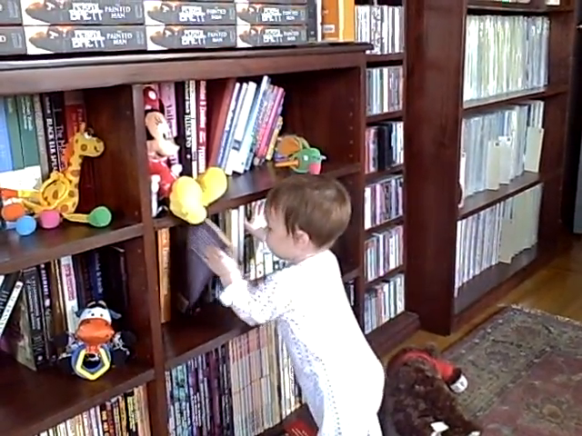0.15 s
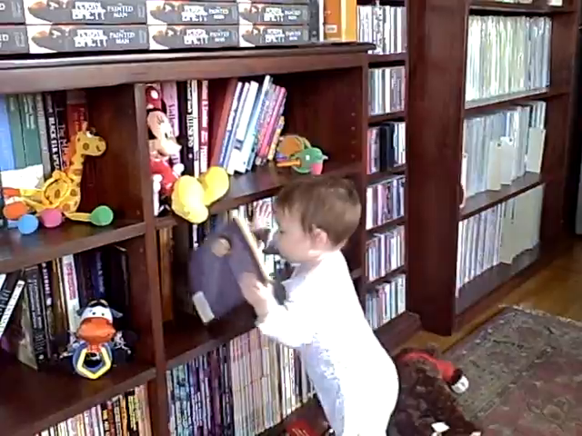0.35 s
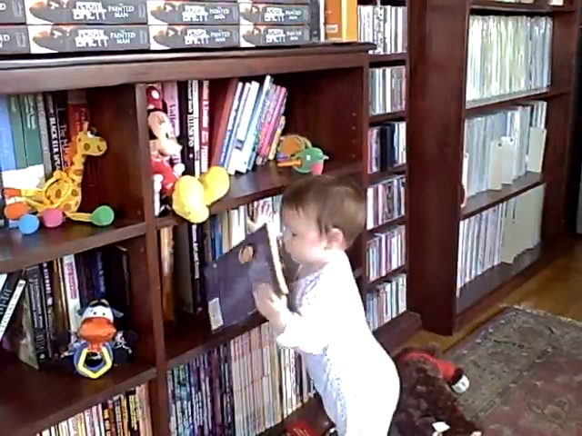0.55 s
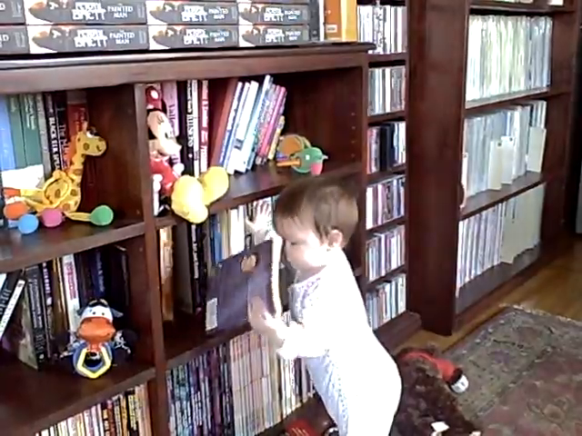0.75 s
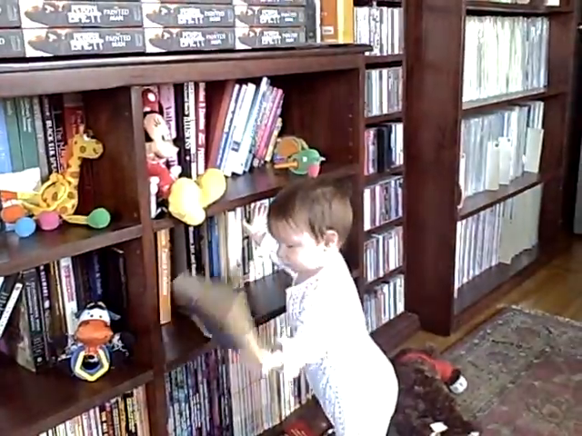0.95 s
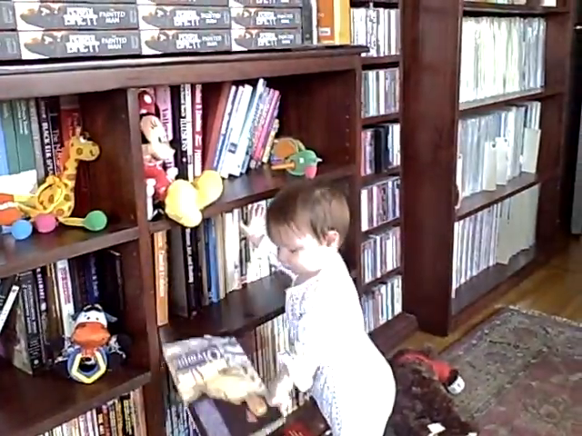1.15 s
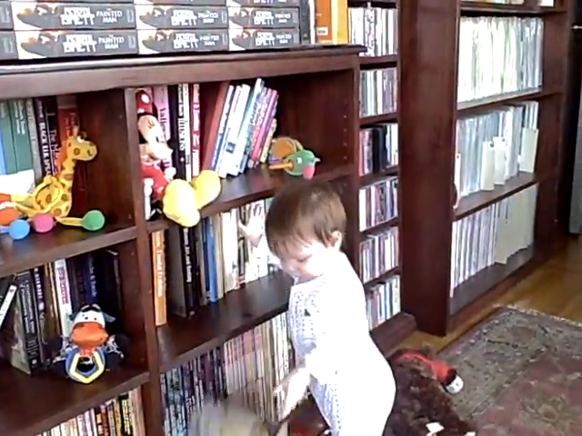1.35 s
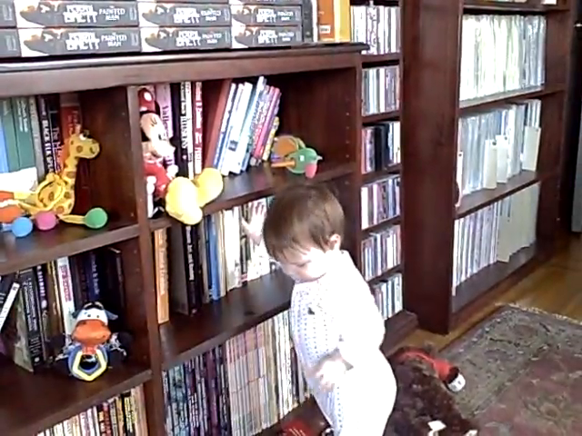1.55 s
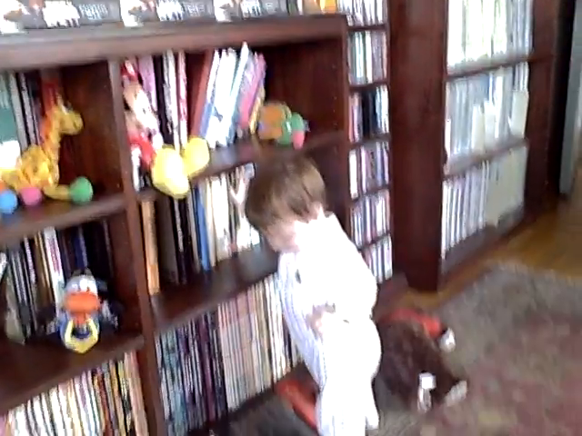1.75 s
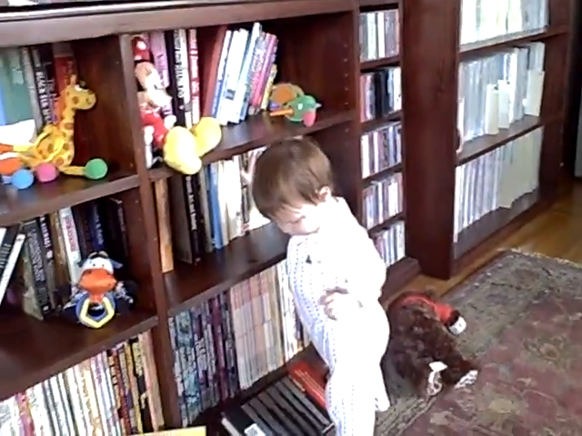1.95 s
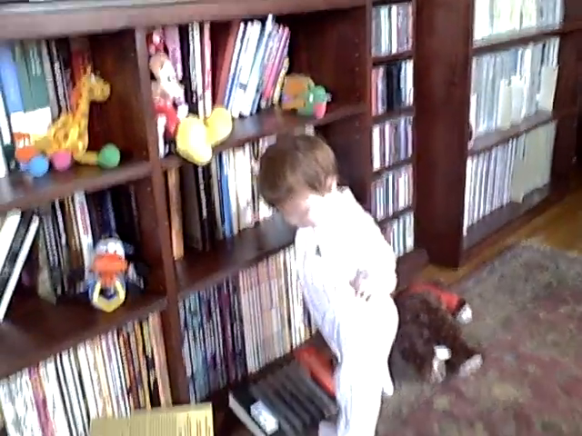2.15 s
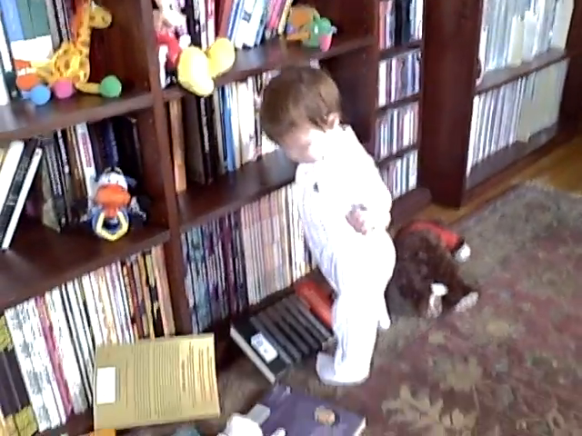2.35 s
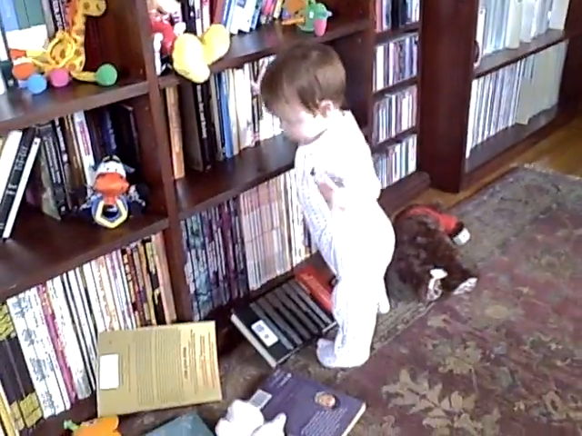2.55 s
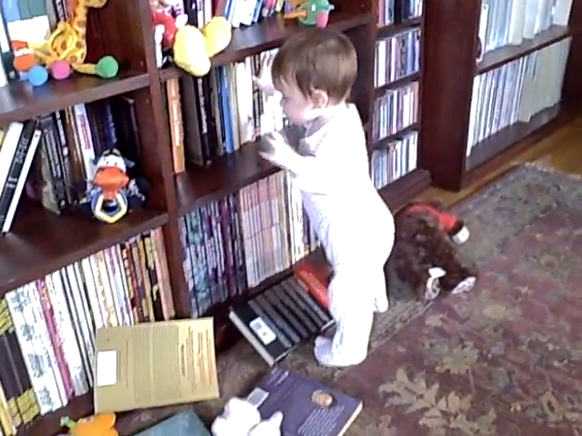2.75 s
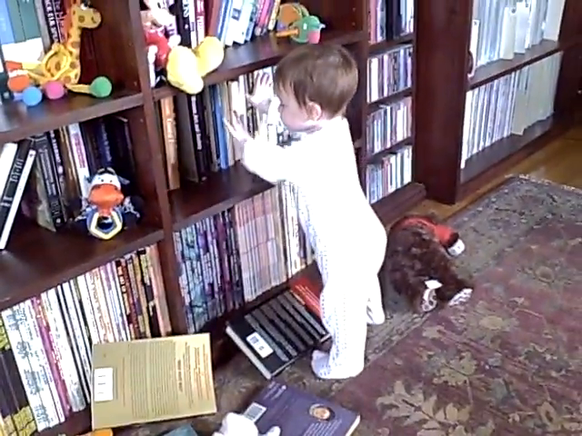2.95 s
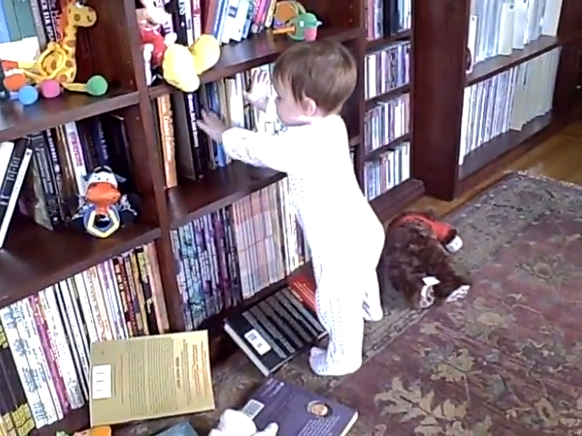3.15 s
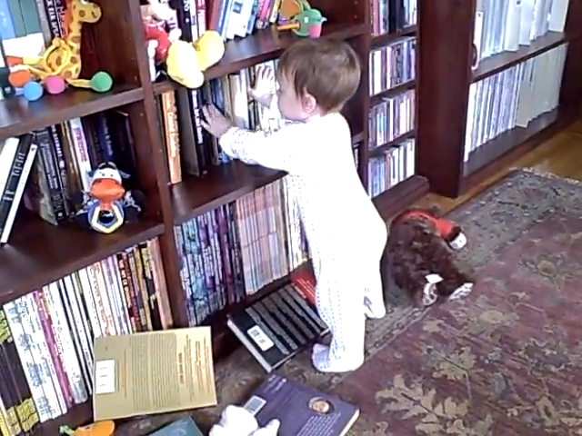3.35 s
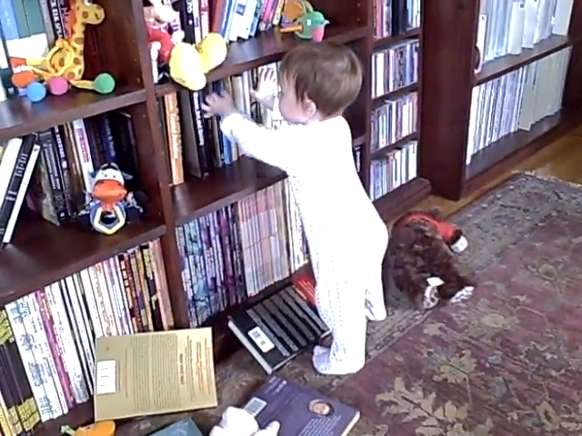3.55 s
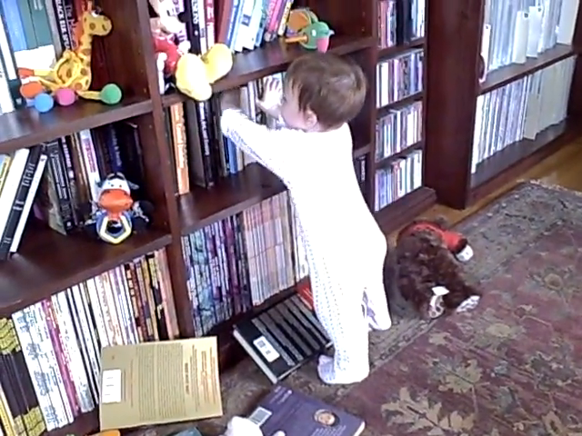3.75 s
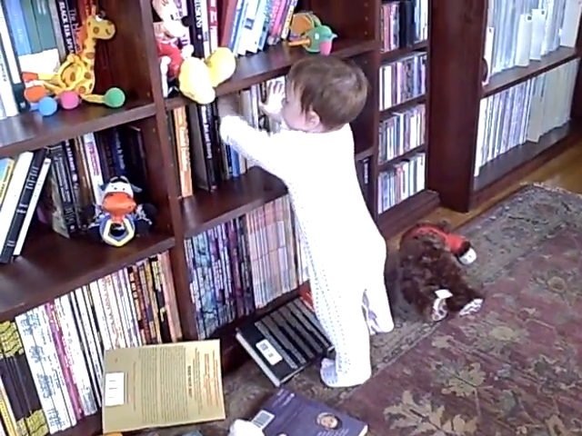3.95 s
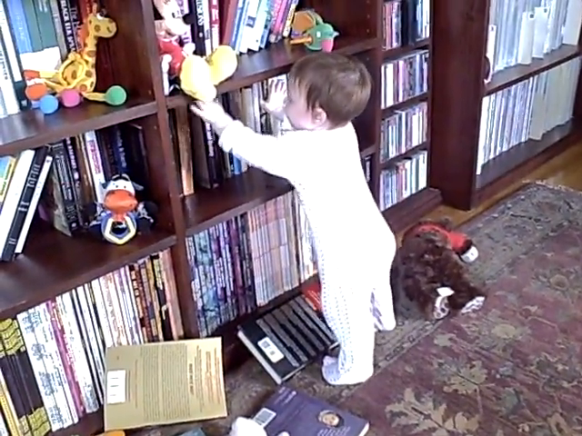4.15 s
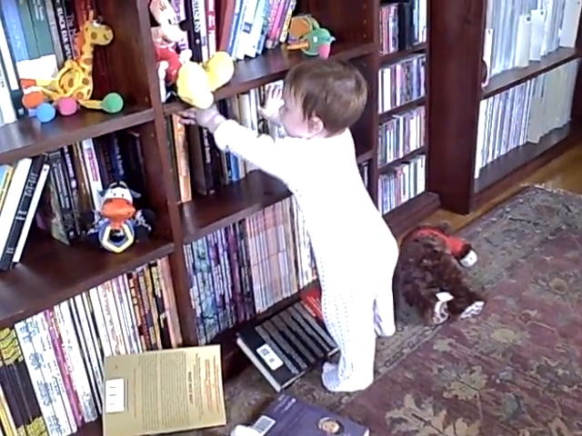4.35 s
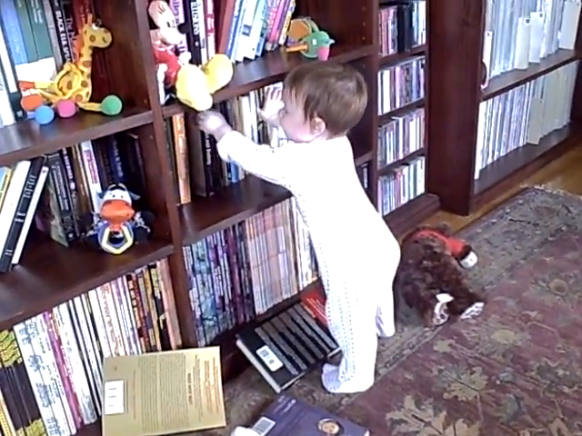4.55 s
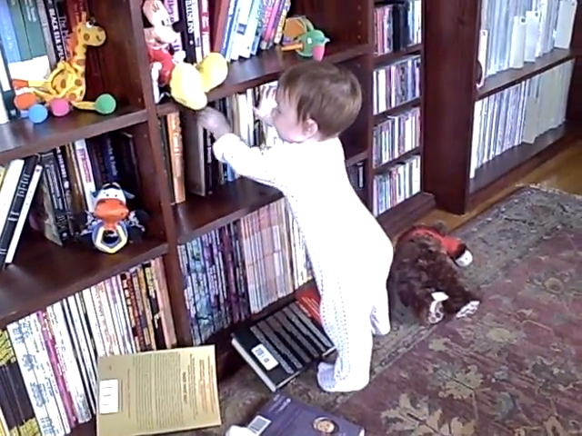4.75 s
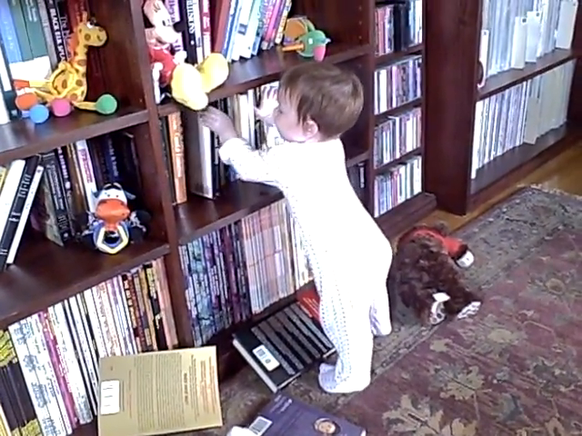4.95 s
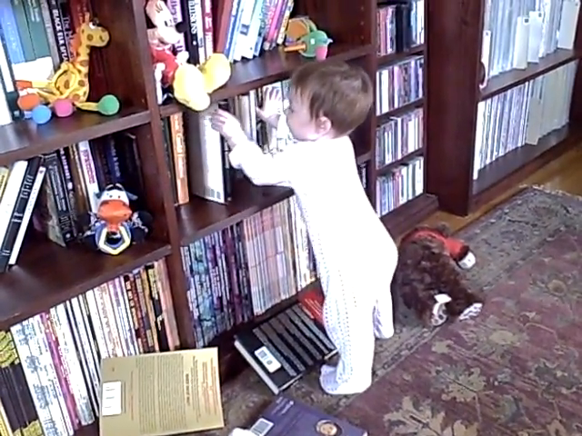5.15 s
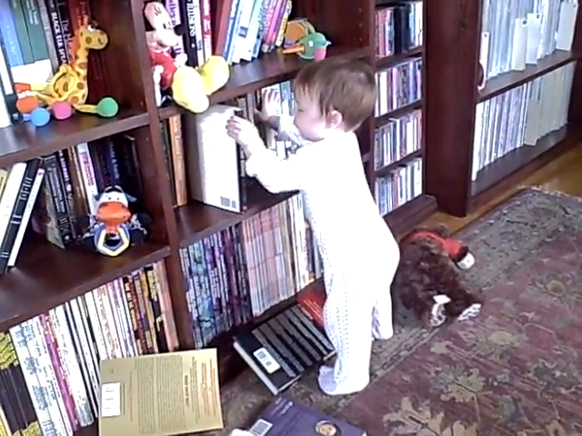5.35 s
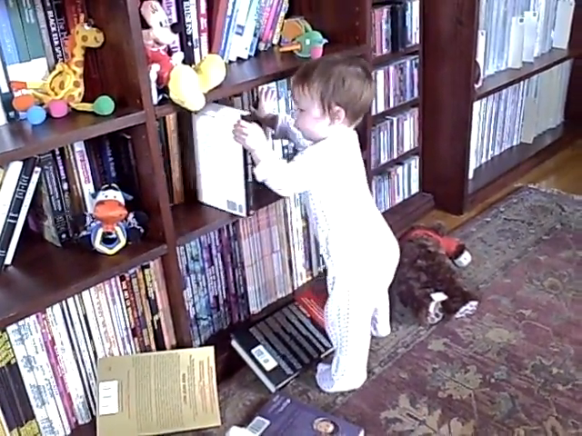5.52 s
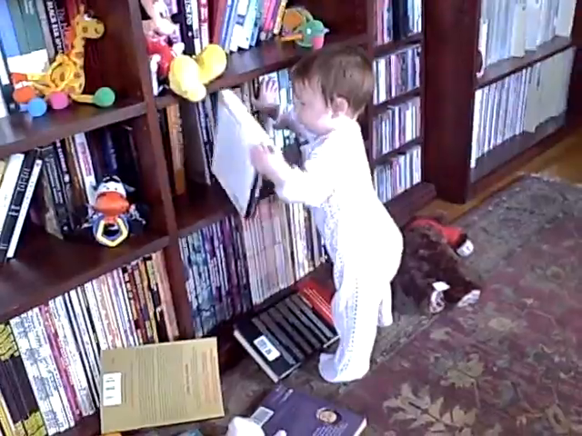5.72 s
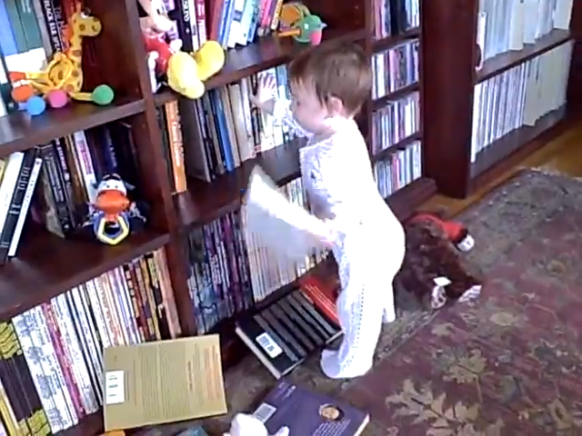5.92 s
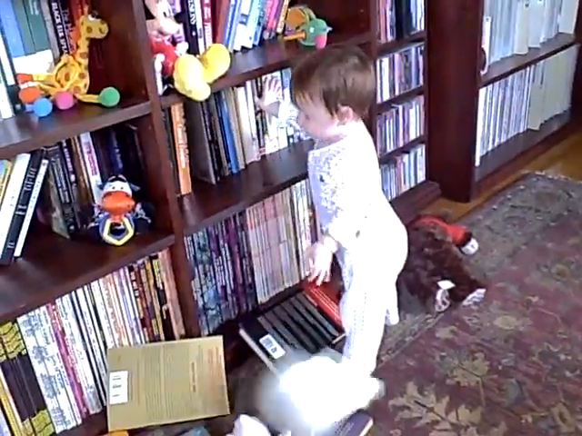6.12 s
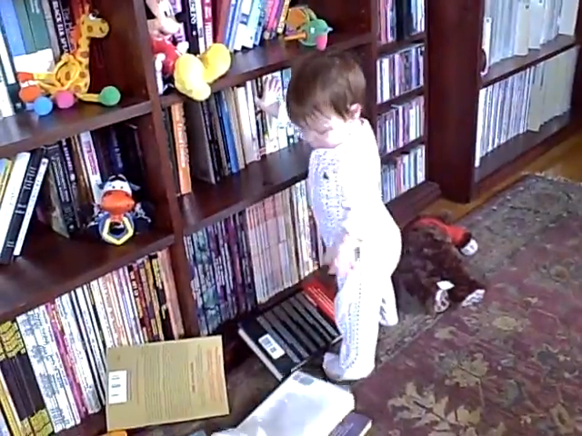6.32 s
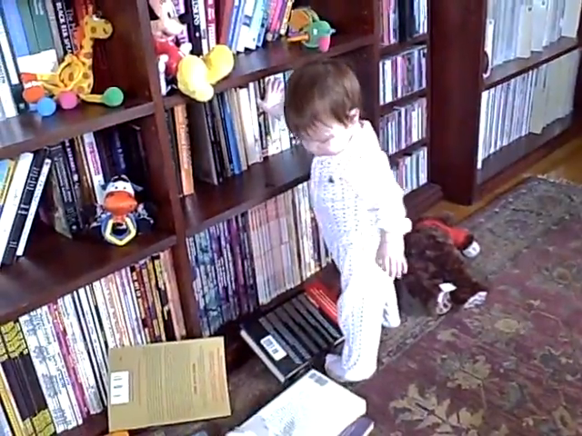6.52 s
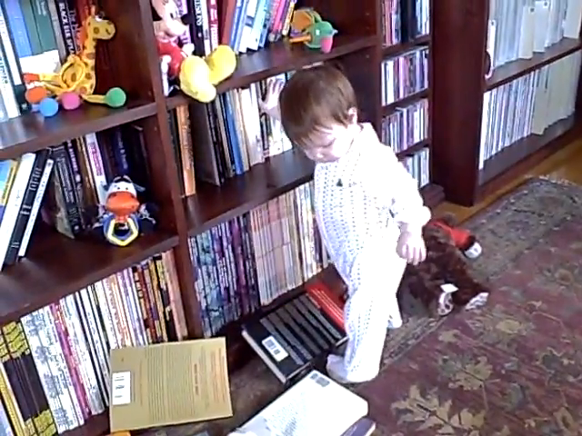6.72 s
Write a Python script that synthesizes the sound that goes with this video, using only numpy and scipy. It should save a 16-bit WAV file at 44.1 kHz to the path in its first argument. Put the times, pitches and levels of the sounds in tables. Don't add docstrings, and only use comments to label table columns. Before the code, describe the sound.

Soft scraping and a low wooden boom, then a book drops in a sharp knock followed by a loose cluster of thumps and bead clicks. A lone double wooden knock breaks the quiet midway. Later come faint creaks rising in pitch, a final slide, and one loud hard landing with a rebound and a toy rattle. Close indoor space, muffled treble, steady low hiss.

```python
import sys
import numpy as np
from scipy import signal
from scipy.fft import rfft, irfft
from scipy.io import wavfile

SR = 44100
rng = np.random.default_rng(int(sys.argv[2]) if len(sys.argv) > 2 else 0)


def inscribe(sig):
    pcm = np.round(np.clip(np.atleast_2d(sig).T, -1, 1) * 32767)
    wavfile.write(sys.argv[1], SR, pcm.astype(np.int16))


def ratio_of_db(decibels):
    return 10 ** (np.asarray(decibels, float) / 20)


N = 303395


def band(x, hz, width_hz):
    return signal.lfilter(*signal.iirpeak(hz, hz / width_hz, fs=SR), x)


def steep_band(x, hz, width_hz, outer_width_hz):
    return band(band(x, hz, width_hz), hz, outer_width_hz)


def lowpass(x, order, hz):
    return signal.sosfilt(signal.butter(order, hz, fs=SR, output="sos"), x)


def peak(x, db):
    return x * ratio_of_db(db) / np.abs(x).max()


def unit(x):
    return x / np.sqrt(np.mean(x ** 2))


def add(out, start_s, x):
    i = int(start_s * SR)
    out[i:i + len(x)] += x[:N - i]


def grit(rate_hz, spread_db):
    hits = rng.random(N) < rate_hz / SR
    sizes = ratio_of_db(spread_db * rng.exponential(size=N))
    return hits * rng.choice([-1, 1], N) * sizes


def stroke(start_s, length_s, db):
    rise_share, roundness = 0.45, 0.7
    u = (np.arange(N) / SR - start_s) / length_s
    ramp = np.minimum(u / rise_share, (1 - u) / (1 - rise_share))
    return ratio_of_db(db) * np.clip(ramp, 0, 1) ** roundness


def burst(noise, length_s):
    t = np.arange(noise.shape[-1]) / SR
    rise = np.minimum(t / (0.00055 + 0.15 * length_s), 1)
    return noise * np.exp(-t / max(length_s, 0.0005)) * rise


def room(echo_db):
    # [f/Hz, t60/s, level beside direct sound/dB]
    tail_bands = [(101, 0.28, -0.5), (245, 0.19, 3), (600, 0.26, 1), (1280, 0.13, 1.5), (2310, 0.36, 5),
                  (4440, 0.06, 3), (6500, 0.17, -1.5)]
    t = np.arange(SR * 3 // 10) / SR
    noise = rng.standard_normal(len(t))
    tail = 0
    for hz, t60_s, db in tail_bands:
        ring = unit(band(noise, hz, 1.08 * hz)) * np.exp(-np.log(1000) * t / t60_s)
        density = np.sqrt(2 * np.log(1000) * 0.89 * hz / t60_s) / SR
        tail = tail + ratio_of_db(db + echo_db) * ring * density
    tail = tail * np.clip((t - 0.0015) / 0.0049, 0, 1)
    tail[0] = 1
    return tail


def struck(push, modes, echo, db):
    heard = signal.fftconvolve(push, echo)
    rings = [ratio_of_db(mode_db) * unit(steep_band(heard, hz, width_hz, 3 * width_hz))
             for hz, width_hz, mode_db in modes]
    return peak(sum(rings), db)


def hush():
    # [f/Hz, density/dB per Hz]
    spectrum = [(15, 0.5), (59, -3), (172, -11), (550, -16.5), (1920, -25), (6110, -27), (6960, -31.5),
                (7940, -61.5)]
    level_db, rumble_cut_hz = -66.5, 12
    f = np.maximum(np.fft.rfftfreq(N, 1 / SR), 1)
    hz, db = np.transpose(spectrum)
    gain = ratio_of_db(np.interp(np.log(f), np.log(hz), db)) / (1 + (rumble_cut_hz / f) ** 8)
    return unit(irfft(rfft(rng.standard_normal(N)) * gain, N)) * ratio_of_db(level_db)


def slides():
    # [start/s, length/s, level/dB, cavity f/Hz, rasp above it/dB]
    slide_strokes = [
        (0.047, 0.19, -71, 910, -5),
        (.15, 0.2, -68, 870, -8),
        (0.299, 0.14, -53.5, 900, -21.5),
        (0.413, 0.19, -70.5, 820, -20),
        (5.09, 0.16, -74, 990, -9),
        (5.188, 0.28, -67.5, 800, -12.5),
        (5.385, 0.093, -73, 680, -12),
        (5.435, 0.17, -75, 770, -9),
        (5.832, 0.19, -64, 630, -7),
    ]
    # [start/s, length/s, level/dB, f/Hz]
    creak_strokes = [
        (5.09, 0.079, -62, 245),
        (5.188, 0.13, -70, 302),
        (5.32, 0.055, -60, 343),
        (5.377, 0.085, -59, 474),
        (5.503, 0.061, -72, 495),
    ]
    # [f/Hz, width/Hz, level/dB]
    rasp_modes = [(1520, 450, 4.5), (2240, 300, -3), (3370, 550, -0.5)]
    # [start/s, length/s, level/dB]
    boom_strokes = [
        (0.312, .11, -62),
        (0.422, .2, -64.5),
        (5.19, 0.11, -65),
        (5.854, 0.099, -56.5),
        (5.922, .07, -65),
    ]
    # [start/s, length/s, level/dB]
    hiss_strokes = [
        (0.095, 0.096, -74.5),
        (0.168, 0.13, -71),
        (.3, .12, -81.5),
        (5.87, .11, -79),
    ]

    rub = lowpass(grit(1500, 2.5), 6, 1750)
    boom = unit(band(band(grit(450, 3.9), 233, 70), 200, 160))
    scrape = grit(3000, 2.4)
    rasp = unit(sum(ratio_of_db(db) * unit(steep_band(scrape, hz, width_hz, 2 * width_hz))
                    for hz, width_hz, db in rasp_modes))
    hiss = unit(band(band(rng.standard_normal(N), 6400, 900), 5800, 1500))
    slip = grit(600, 0.75)

    out = boom * sum(stroke(*row) for row in boom_strokes)
    out += hiss * sum(stroke(*row) for row in hiss_strokes)
    for start_s, length_s, db, hz, rasp_db in slide_strokes:
        cavity = unit(steep_band(rub, hz, 0.72 * hz, 0.9 * hz))
        out += stroke(start_s, length_s, db) * (cavity + ratio_of_db(rasp_db) * rasp)
    for start_s, length_s, db, hz in creak_strokes:
        out += stroke(start_s, length_s, db) * unit(steep_band(slip, hz, 0.073 * hz, 0.12 * hz))
    return out


def book_blows():
    # [t/s, knock peak/dB, thud re knock/dB, edge re knock/dB, contact/s]
    first_book = [(0.153, -55, -1, 3.5, 0.0016), (1.088, -55, -1.5, -5.5, 0.013),
                  (1.106, -54, 8, -3, 0.0063), (1.175, -33, -8.5, -5, 0.0034), (1.2, -51, 9, -10, 0.004),
                  (1.222, -59.5, 6, 6, 0.003), (1.293, -60.5, -8, 9.5, 0.012),
                  (1.314, -72.5, -16, 19, 0.0036), (1.506, -49.5, 11, 0, 0.011), (1.525, -51, 7, 2, .0065),
                  (1.55, -42, -6, -2.5, 0.012), (1.586, -44, -14, 11.5, 0.0026),
                  (1.608, -41, -15, -3.5, 0.017), (1.631, -35.5, 5.5, 2, 0.003),
                  (1.642, -32, -12.5, 0.5, 0.004), (1.666, -47, 0, 3, 0.0053),
                  (1.748, -45, -8, -17, 0.0037), (1.864, -63, 13.5, -15, 0.0093),
                  (1.89, -76, 23, -15, 0.0089)]
    # [t/s, knock peak/dB, thud re knock/dB, edge re knock/dB, contact/s]
    second_book = [(4.607, -58.5, 2, -2.5, 0.00094), (6.175, -58, 8, -0.5, .012),
                   (6.185, -54, 16, -3.5, 0.0031), (6.194, -36.5, 2, 0.5, 0.012),
                   (6.208, -34, -9, 0, 0.0049), (6.229, -22.5, 0.5, -3.5, 0.0021),
                   (6.233, -17, -6.5, -1, 0.0045), (6.247, -26, -11.5, -6, 0.0055),
                   (6.283, -54, -6, -3, .011), (6.355, -53, -13, 10.5, 0.0051), (6.372, -47, 0, -3, .0014),
                   (6.414, -36, -2.5, 5.5, 0.003), (6.425, -45, 2, 3, 0.0093),
                   (6.764, -62, -20, -12, .0015)]
    # [f/Hz, width/Hz, level/dB]
    floor_modes = [(120, 180, -19), (197, 65, 1.5), (245, 75, -6.5), (295, 56, -10.5)]
    # [f/Hz, width/Hz, level/dB]
    hollow_modes = [(441, 44, -6), (545, 64, 1.5), (606, 44, -1)]
    # [f/Hz, width/Hz, level/dB]
    cover_modes = [(737, 67, 2), (828, 74, 2.7), (924, 164, 3.2)]
    # [f/Hz, width/Hz, level/dB]
    edge_modes = [(1158, 150, 2.5), (1286, 88, -5), (1544, 65, -4), (1633, 70, -6)]
    out = np.zeros(N)
    for t_s, db, thud_db, edge_db, contact_s in [*first_book, *second_book]:
        push = burst(rng.standard_normal((4, SR // 16)), contact_s)
        echo = room(np.interp(contact_s, [0.002, 0.004], [-7, 0]))
        hollow_db = -3 - 0.3935 * (db + 46)
        add(out, t_s, struck(push[0], floor_modes, echo, db + thud_db))
        add(out, t_s, struck(push[1], hollow_modes, echo, db + hollow_db))
        add(out, t_s, struck(push[2], cover_modes, echo, db))
        add(out, t_s, struck(push[3], edge_modes, echo, db + edge_db))
    return lowpass(out, 8, 1735)


def slaps():
    # [t/s, peak/dB, top re body/dB, length/s]
    slap_hits = [(0.154, -51, -11, .0018), (1.087, -62, -5.5, 0.072), (1.172, -39.5, -10.5, 0.0028),
                 (1.196, -50.5, -7, 0.019), (1.295, -54.5, -6, 0.02), (1.311, -59.5, -4, .012),
                 (1.503, -46, -6, 0.028), (1.521, -43.5, -11, 0.007), (1.542, -50.5, -10, 0.01),
                 (1.585, -48, -14.5, 0.0041), (1.632, -47.5, -14, 0.013), (1.648, -47, -10, 0.003),
                 (3.729, -50.5, -13, 0.0028), (3.736, -57, -1, 0.0042), (6.161, -57, -7.5, 0.029),
                 (6.19, -49.5, -7, 0.032), (6.205, -48, -12, 0.0078), (6.23, -26, -13.5, 0.0092),
                 (6.251, -32, -7.5, 0.0053), (6.284, -49.5, -0.5, 0.021), (6.415, -33, 2.5, .0019),
                 (6.431, -42, -0.5, 0.005)]
    # [f/Hz, width/Hz, level/dB]
    body_modes = [(2350, 410, -3), (2666, 1180, 3.5), (3304, 650, 3.5), (3870, 890, -17),
                  (4600, 1200, -9.5)]
    # [f/Hz, width/Hz, level/dB]
    top_modes = [(5540, 1500, -2), (6360, 760, 5)]
    out = np.zeros(N)
    for t_s, db, top_db, length_s in slap_hits:
        push = burst(rng.standard_normal((2, SR // 10)), length_s)
        echo = room(-5.5)
        add(out, t_s, struck(push[0], body_modes, echo, db))
        add(out, t_s, struck(push[1], top_modes, echo, db + top_db))
    return out


def corner_ticks():
    # [t/s, peak/dB, f/Hz, width/Hz]
    tick_hits = [
        (1.176, -41, 3260, 400),
        (1.536, -46.5, 4170, 400),
        (6.358, -59, 4600, 904),
        (6.416, -31, 3640, 300),
    ]
    out = np.zeros(N)
    for t_s, db, hz, width_hz in tick_hits:
        push = burst(rng.standard_normal(SR // 16), 0.0012)
        add(out, t_s, struck(push, [(hz, width_hz, 0)], room(-17.5), db))
    return out


def rattle():
    # [t/s, peak/dB]
    bead_clicks = [(1.2026, -56), (1.507, -52), (1.5152, -47), (1.5345, -49), (1.6221, -42.5), (1.644, -45),
                   (1.661, -42.5), (1.6753, -47), (1.709, -57), (1.7463, -52), (1.768, -51), (1.7862, -53),
                   (1.845, -62), (6.252, -48), (6.2629, -37.5), (6.2724, -48), (6.2937, -53), (6.329, -43),
                   (6.3487, -45), (6.3786, -51), (6.394, -47.5), (6.4145, -38), (6.4368, -42),
                   (6.4666, -33.5), (6.49, -46), (6.5078, -49), (6.5318, -46), (6.5512, -51), (6.588, -57),
                   (6.6218, -58)]
    # [t/s, level/dB, fade/dB per s, time to rest/s]
    bead_jolts = [
        (1.5, -51, 223, .12),
        (1.62, -52, 61, .32),
        (6.16, -58, 208, 0.064),
        (6.233, -36.5, 199, 0.2),
        (6.412, -55, 13, 0.27),
    ]
    shell_hz, scatter = 5940, 0.01
    out = np.zeros(N)
    for t_s, db in bead_clicks:
        noise = rng.standard_normal(SR // 40)
        tick = burst(noise, 0.0012)
        hz = shell_hz * (1 + scatter * noise[0])
        add(out, t_s, peak(steep_band(tick, hz, 500, 900), db - 1.0))
        add(out, t_s, peak(band(band(tick, 5900, 1800), 5700, 2500), db - 10.5))
    rolling = unit(band(band(band(grit(450, 2.3), 5950, 450), 6000, 800), 6500, 1300))
    for t_s, db, fade_db_per_s, rest_s in bead_jolts:
        t = np.arange(N) / SR - t_s
        gate = np.clip(np.minimum(t / 0.008, (rest_s - t) / 0.046), 0, 1)
        out += gate * ratio_of_db(db - 10.5 - fade_db_per_s * np.maximum(t, 0)) * rolling
    return out


def joists():
    # [t/s, peak/dB, f/Hz, width/Hz]
    joist_hits = [
        (1.635, -55, 50, 25),
        (6.241, -38, 52, 25),
        (6.42, -55, 50, 25),
    ]
    out = np.zeros(N)
    for t_s, db, hz, width_hz in joist_hits:
        push = burst(rng.standard_normal(SR // 5), 0.024)
        modes = [(hz, width_hz, 0), (2.4 * hz, width_hz, -3)]
        add(out, t_s, struck(push, modes, room(0), db))
    return out


def board_knocks():
    # [t/s, peak/dB, contact/s (negative: shortest)]
    spine_knocks = [
        (3.728, -31, -0.47),
        (3.739, -38.5, -0.03),
    ]
    # [f/Hz, width/Hz, level/dB]
    board_modes = [(135, 28, -16), (300, 24, -11.5), (413, 31, -6), (523, 68, 0), (610, 134, -0.5),
                   (757, 75, -0.5), (872, 60, 1.5), (944, 130, 3), (1156, 46, -9), (1390, 44, -8),
                   (1670, 150, -15)]
    out = np.zeros(N)
    for t_s, db, contact_s in spine_knocks:
        push = burst(rng.standard_normal(SR // 16), contact_s)
        add(out, t_s, struck(push, board_modes, room(1.8), db))
    return lowpass(out, 8, 1735)


def scene():
    near = signal.fftconvolve(slides(), room(-2.1))[:N]
    near += book_blows() + slaps() + corner_ticks()
    near += signal.fftconvolve(rattle(), room(-8))[:N]
    near += joists() + board_knocks()
    return (lowpass(near, 12, 7030) + hush())[None]


def top_cut(x):
    return signal.sosfilt(signal.butter(12, 8090, fs=SR, output="sos"), x)


def record(dry):
    top_hz, dither_db = 7800, -99
    cut = signal.sosfilt(signal.ellip(8, 0.2, 70, top_hz, fs=SR, output="sos"), dry)
    mix = cut + ratio_of_db(dither_db) * rng.standard_normal(dry.shape)
    return top_cut(mix)


dry = scene()
out = record(dry)
inscribe(out)
```